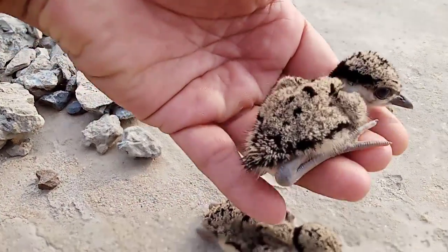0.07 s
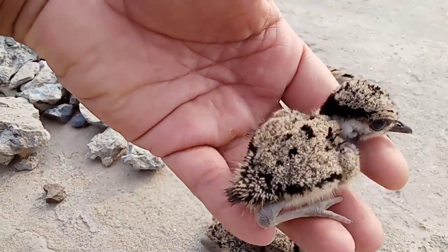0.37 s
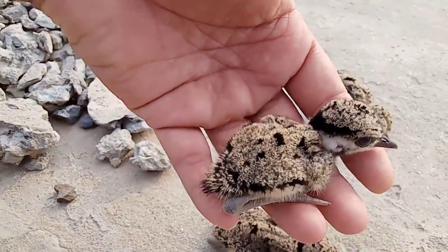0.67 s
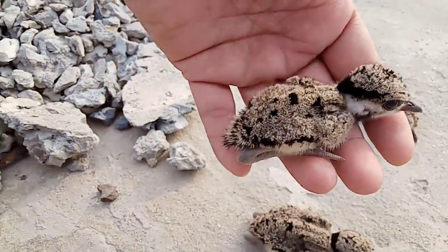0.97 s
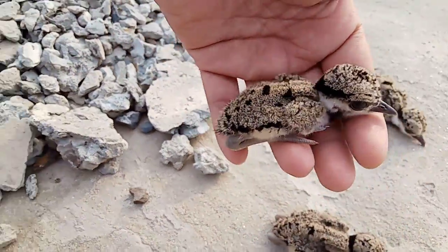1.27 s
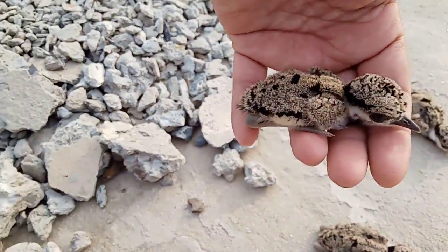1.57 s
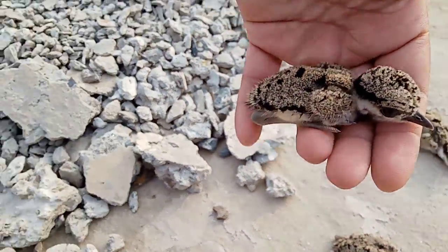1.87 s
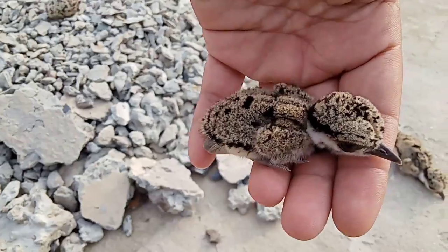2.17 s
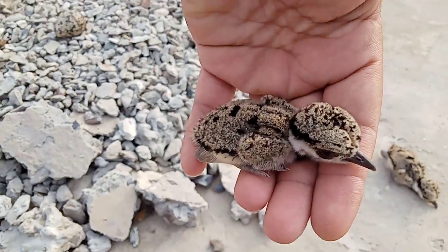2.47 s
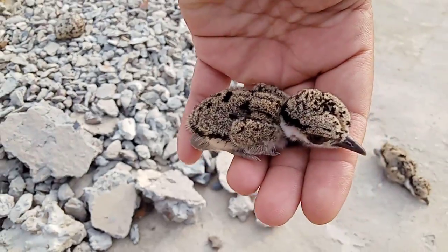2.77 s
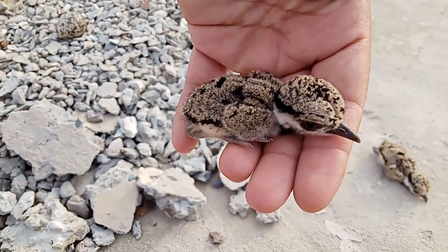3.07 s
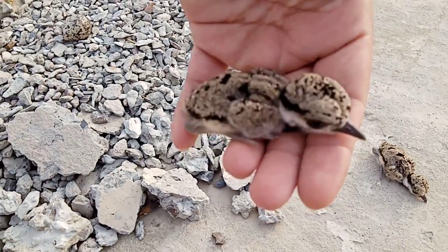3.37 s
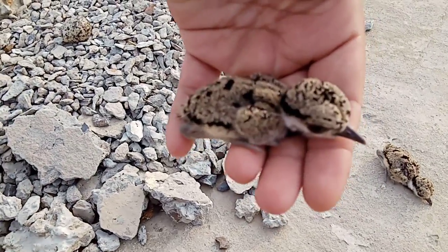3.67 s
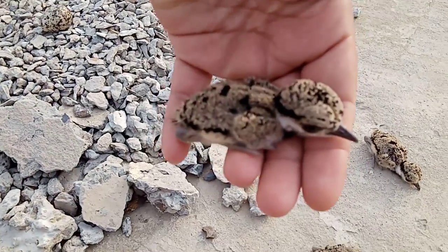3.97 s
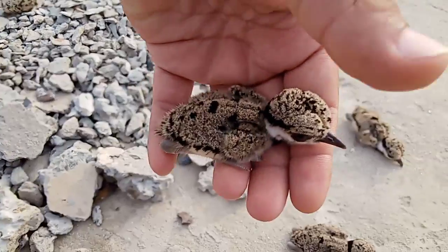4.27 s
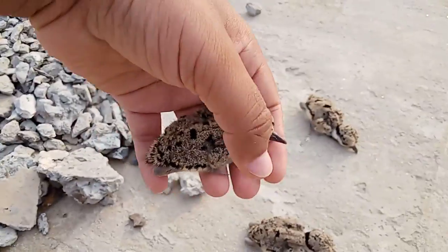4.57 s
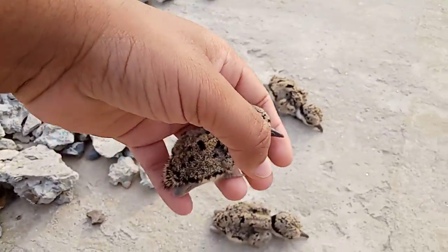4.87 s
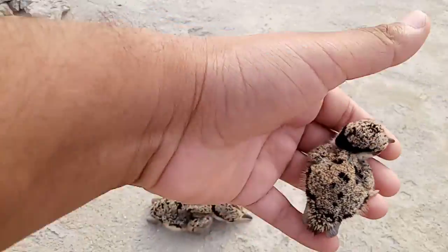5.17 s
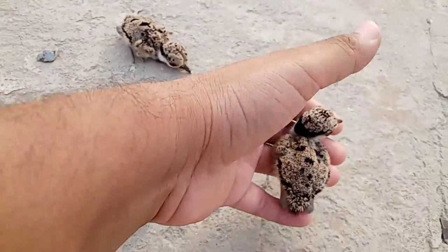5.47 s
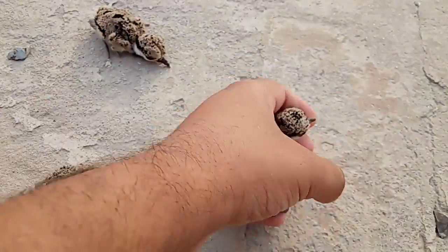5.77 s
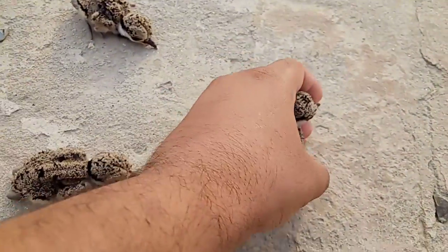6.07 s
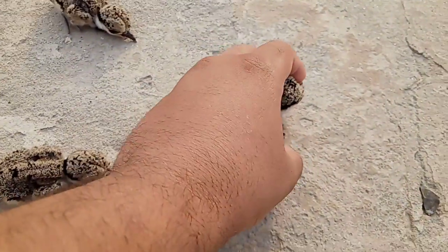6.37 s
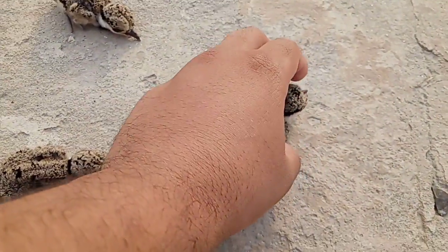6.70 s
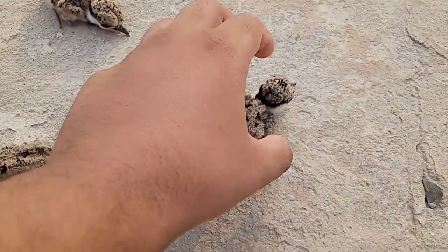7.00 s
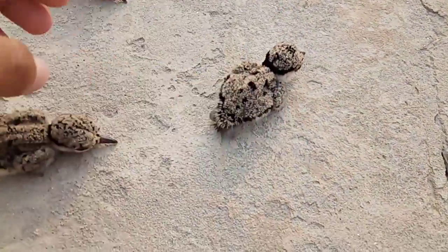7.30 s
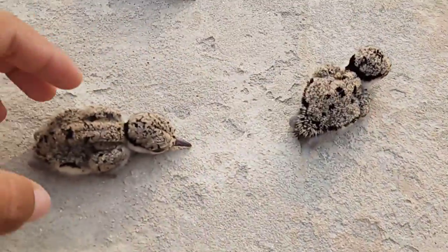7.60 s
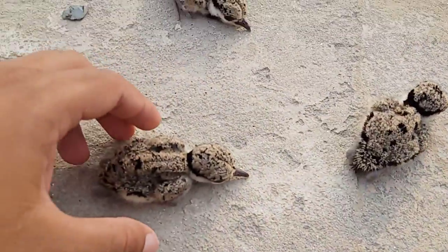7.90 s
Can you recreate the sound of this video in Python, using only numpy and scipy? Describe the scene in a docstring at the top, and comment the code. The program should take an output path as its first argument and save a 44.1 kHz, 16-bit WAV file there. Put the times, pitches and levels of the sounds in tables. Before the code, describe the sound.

Outdoors on bare ground, harsh, high bird calls repeat in quick succession, mixing clipped rattling notes with falling wails that end in a small yelp. They start close and gradually recede. Soft handling knocks and brushing hit the microphone in the first few seconds, over a faint, uneven wind rumble. Around the middle, a low hum and one brief horn are barely audible far away.

```python
"""On open, bare ground, lapwings scold while someone handles their chicks.
Each call is a few rattled 'kips' and a long note whose rattle runs into a falling wail that hooks up
at the end: a pulsed harmonic source, coloured by the throat and echoed by the surroundings. The birds
overlap and grow fainter as they move off. Light wind rumbles, a hand rustles and bumps the microphone,
and faint hums, steady tones and one horn carry from far away, made unsteady by the air."""
import sys
import numpy as np
from scipy import signal
from scipy.fft import rfft, irfft, next_fast_len
from scipy.io import wavfile
from scipy.ndimage import uniform_filter1d

SR = 44100
rng = np.random.default_rng(int(sys.argv[2]) if len(sys.argv) > 2 else 0)


def wav_record(signal):
    """Record a signal, one row per channel, as 16-bit PCM in the file named by sys.argv[1]."""
    frames = np.transpose(np.atleast_2d(signal))
    bounded = np.clip(frames, -1, 1)
    # unit amplitude maps onto the largest positive 16-bit level
    quanta = np.round(bounded * 32767).astype(np.int16)
    wavfile.write(sys.argv[1], SR, quanta)


N = 350154
TIME = np.arange(N) / SR
CUTOFF_HZ = 15900


def from_db(db):
    """Amplitude ratio of a level in decibels."""
    return 10 ** (np.asarray(db) / 20)


def rms_one(x):
    """Normalisation to rms 1."""
    return x / np.sqrt(np.mean(x ** 2) + 1e-20)


def at_hz(points, hz):
    """Interpolation of a spectrum on a log-frequency axis."""
    f, db = np.transpose(points)
    return np.interp(np.log(np.maximum(hz, 1)), np.log(f), db)


def noise(spectrum):
    """Spectral shaping of white noise, rms 1."""
    size = next_fast_len(N)
    gain = from_db(at_hz(spectrum, np.fft.rfftfreq(size, 1 / SR)))
    return rms_one(irfft(rfft(rng.standard_normal(size)) * gain, size)[:N])


def drift(hz):
    """Low-pass random process: a wander at up to about this rate, rms 1."""
    pole = np.exp(-2 * np.pi * hz / SR)
    return rms_one(signal.lfilter([1], [1, -2 * pole, pole * pole], rng.standard_normal(N + SR))[SR:])


def butter(x, hz, kind, order=2):
    """Causal Butterworth filter."""
    sections = signal.butter(order, np.clip(hz, 10, SR / 2 - 100), kind, fs=SR, output="sos")
    return signal.sosfilt(sections, x + 1e-18)


def ease(x):
    """Raised-cosine step from 0 to 1."""
    return np.sin(np.pi / 2 * np.clip(x, 0, 1)) ** 2


def during(start, end):
    """The samples between two times."""
    return slice(max(int(start * SR), 0), min(int(end * SR), N))


# spectra of wind rumble and handling rustle: (frequency [Hz], relative level [dB])
RUMBLE_SPECTRUM = [(20, -42), (30, -40.5), (45, -18), (62, -5.5), (85, -1.5), (115, 1), (170, 2),
                   (215, -4.5), (270, -13.5), (400, -19.5), (700, -52)]
RUSTLE_SPECTRUM = [(150, -9.5), (300, 0.5), (500, -2), (800, -7), (1500, -11.5), (3000, -14.5), (4000, -22),
                   (5500, -34.5), (10000, -35), (12000, -41.5), (16000, -46.5)]
# their envelopes: (time [s], relative rumble level [dB], relative rustle level [dB])
NOISE_ENVELOPES = [(0.0, -51, -58.5), (0.51, -53.5, -64), (0.77, -48, -59), (1.02, -47.5, -49.5),
                   (1.15, -47, -58), (1.77, -52.5, -60.5), (2.1, -49.5, -59), (2.52, -52.5, -56),
                   (2.72, -48.5, -60.5), (3.98, -52.5, -60), (4.55, -46, -56), (4.95, -53, -58.5),
                   (5.55, -56, -61.5), (5.95, -49.5, -60), (6.35, -56.5, -59.5), (6.68, -57, -64.5),
                   (7.67, -49.5, -57.5), (7.94, -53, -58)]


def wind_and_rustle(rumble_gain_db=1, rustle_gain_db=3, lumpy_db=1.5, grain_db=1.5):
    """Random amplitude modulation makes the wind's rumble lumpy and the hand's rustle grainy."""
    times, rumble_db, rustle_db = np.transpose(NOISE_ENVELOPES)
    rumble = from_db(np.interp(TIME, times, rumble_db) + rumble_gain_db + lumpy_db * drift(hz=23))
    rumble *= noise(RUMBLE_SPECTRUM)
    rustle = from_db(np.interp(TIME, times, rustle_db) + rustle_gain_db + grain_db * drift(hz=60.2))
    rustle *= noise(RUSTLE_SPECTRUM)
    return rumble + rustle


def rattle(cycle, duty, attack=0.075, release=0.34):
    """Pulse modulation: each pulse opens sharply and closes gently; a low duty leaves a gap."""
    return uniform_filter1d(ease(cycle / attack) * ease((duty - cycle) / release), size=24)


def upper_level(pitch_hz, third_db, usual_hz=1359, db_per_hz=0.0959):
    """Vocal effort: a bird that presses harder sings higher and brighter. Gain [dB] of harmonics 4 up."""
    return -11 + db_per_hz * (pitch_hz - usual_hz) + 0.85 * third_db


FUNDAMENTAL_DB = -22.5   # relative to the second harmonic, which the throat favours
# throat response for the fourth and higher harmonics: (frequency [Hz], gain [dB])
THROAT_RESPONSE = [(3700, -14.5), (4700, 8), (5400, -3.5), (6600, -6), (8100, -13), (8900, -20.5),
                   (9800, -15), (10500, -18.5), (11200, -23.5), (12200, -26.5), (13500, -31.5),
                   (15500, -35.5)]


def syrinx(pitch, first_db, third_db, upper_db, flutter, shimmer_db=2.0):
    """Source and filter: the throat colours a harmonic series whose upper partials flutter most."""
    phase = 2 * np.pi * np.cumsum(pitch) / SR
    out = from_db(first_db) * np.sin(phase) + np.sin(2 * phase)
    out += from_db(third_db + flutter / 2) * np.sin(3 * phase)
    for k in range(4, 14):
        swings = rng.standard_normal(size=6)
        shimmer = shimmer_db * np.interp(np.linspace(0, 5, len(pitch)), np.arange(6), swings)
        level_db = upper_db + at_hz(THROAT_RESPONSE, k * pitch) + flutter + shimmer
        out += from_db(level_db) * np.sin(k * phase) * (k * pitch < CUTOFF_HZ)
    return np.sqrt(2) * out


def squeak(pitch, cycle, spread_db=5, scatter=0.1):
    """Inharmonic partial: as each pulse opens, an unstable tone dives between harmonics 3 and 2."""
    pulse = np.cumsum(np.diff(cycle, prepend=0) < -.5)
    strength, offset = np.clip(rng.standard_normal((pulse[-1] + 1, 2)), -1.5, 1.5)[pulse].T
    ratio = 2.7 + scatter * offset - .45 * cycle
    envelope = from_db(spread_db * strength) * ease(cycle / .1) * np.exp(-(cycle / .42) ** 2)
    return envelope * np.sin(2 * np.pi * np.cumsum(pitch * ratio) / SR)


# short notes: (start [s], brief pulses [count], held pulse [s], pitch [Hz], relative level [dB],
# third harmonic re second [dB], roughness [ratio])
KIP_NOTES = [(0.022, 2, 0.024, 1370, -23, 6.5, 0.18), (0.354, 2, .033, 1432, -22.5, -1, 0.42),
             (0.979, 2, 0.0213, 1377, -20.5, -1.5, 0.33), (1.264, 2, 0.023, 1415, -22, -5.5, 0.42),
             (1.790, 2, 0.028, 1356, -28.5, -12.5, 0.17), (2.087, 0, .017, 1348, -34, 0, 0.2),
             (2.181, 2, 0.021, 1407, -27.5, -6.5, 0.42), (2.519, 3, 0.028, 1320, -35, -8.5, 0.2),
             (3.282, 3, .013, 1294, -35, -5.5, 0.37), (3.356, 0, 0.025, 1392, -38.5, -8.5, .3),
             (3.456, 3, 0.01, 1423, -34.5, -9.5, 0.42), (4.320, 0, 0.03, 1352, -35.5, -6.5, 0.03),
             (4.350, 2, 0.028, 1336, -35, -8, 0.3), (4.422, 3, 0.02, 1387, -36, -11, 0.42),
             (5.540, 5, 0.0216, 1420, -34, -15, 0.9), (5.666, 0, 0.026, 1362, -35.5, -9.5, 0.2),
             (5.777, 2, 0.022, 1390, -32, -14.5, 0.33), (6.069, 6, 0.019, 1396, -39, -11, 1),
             (6.835, 0, 0.034, 1358, -50.5, -5.5, 0.25), (6.952, 2, 0.033, 1370, -44, -10.5, 0.51),
             (7.283, 8, 0.023, 1382, -46.5, -7, 1.23), (7.693, 2, 0.022, 1332, -37.5, -6.5, 0.36)]


def kips(jitter, flutter, rasp, duty=0.68, sag=.025, scoop=.03, droop=0.062, rough_jitter=0.016,
         rasp_db=-17, squeak_db=-12, onset_db=-5):
    """Pulsed phonation: the last pulse is held as the pitch droops; in rough notes the pulses merge."""
    out = np.zeros(N)
    for start, count, held_s, top_hz, level_db, third_db, rough in KIP_NOTES:
        pulse_hz = 111 if rough > .5 else 65
        last = round(count)
        end = start + last / pulse_hz + held_s
        span = during(start, end)
        t = TIME[span]
        pulses = (t - start) * pulse_hz
        cycle = np.where(pulses < last, pulses % 1, np.minimum(pulses - last, .4))
        gate = rattle(cycle, duty + rough / 3) * ease((end - t) / 0.0036)
        onset = np.exp(-np.abs(t - start) / 0.011)
        arch = 1 - scoop * onset - droop * np.clip((t - end + .034) / 0.0333, 0, 1) ** 2
        pitch = top_hz * arch * (1 + sag * (.4 - cycle) + rough * rough_jitter * jitter[span])
        harsh_db = 9 * rough ** 2   # brings the fundamental, rasp and squeaks forward
        upper_db = upper_level(top_hz, third_db)
        voice = syrinx(pitch, FUNDAMENTAL_DB + harsh_db, third_db, upper_db, flutter[span])
        voice += 2 * rough * from_db(rasp_db + third_db / 2 + harsh_db / 2) * rasp[span]
        squeaks = squeak(pitch, cycle) * ease((last + .5 - pulses) / 0.23)
        voice += from_db(squeak_db + harsh_db + third_db / 2 + 2 * flutter[span]) * squeaks
        out[span] += from_db(level_db + 1.0 + onset_db * onset) * gate * voice
    return out


def wail_course(bottom_hz):
    """Pitch contour: the deepest wails curl up slowly; shallow ones crack early into a long, high yelp."""
    depths_hz = (896, 940.3, 1047)   # deepest, deep, shallow
    pulse_hz, yelp_hz = (65.5, 65.5, 72), (1090, 1497, 1633)
    fall_s, rise_s, yelp_s = (.077, .077, .065), (0.066, .034, .004), (0.0033, .014, .033)
    return [np.interp(bottom_hz, depths_hz, row) for row in (pulse_hz, fall_s, rise_s, yelp_s, yelp_hz)]


# long notes: (start [s], rattle length [s], top pitch [Hz], bottom pitch [Hz], rattle level [dB],
# glide level [dB], third harmonic re second [dB], glide roughness [ratio])
WAIL_NOTES = [(0.14, 0.13, 1383, 1112, -24, -24, 3, 0.4), (0.481, 0.12, 1388, 942, -21, -27, -5, 0.04),
              (1.099, .128, 1321, 1008, -20.5, -21.5, -8.5, 0.02),
              (1.39, .130, 1362, 936.4, -23, -29, -11.5, .1),
              (1.921, .110, 1314, 1013, -33, -31.5, -13, 0.2), (2.306, .130, 1345, 932, -27.5, -36, -10, 0),
              (2.653, 0.099, 1283, 1054, -37.5, -30.5, -11, .1),
              (3.418, 0.11, 1280, 1058, -37, -32, -9.5, 0.12),
              (3.583, .130, 1350, 937, -36.5, -36, -9, 0.2), (4.493, .148, 1333, 900, -34.5, -32, -16, 0.2),
              (4.555, .065, 1329, 1038, -31, -45, -18, 0.2),
              (5.902, 0.14, 1348, 951, -32.5, -44.5, -16, 0.38),
              (6.226, 0.13, 1332, 1042, -43, -39, -9.5, 0.54), (7.074, .110, 1332, 913, -48, -46, -8, 0.46),
              (7.816, 0.12, 1324, 984, -42.5, -45, -5.5, .3)]


def wails(jitter, flutter, rasp, first_duty=0.7, last_duty=1.16, sag=.03, rattle_jitter=0.016,
          rough_jitter=0.062, rasp_db=-19, screech_db=-7, squeak_db=-7, soften_db=-7, rise_hz=165,
          yelp_db=2, yelp_first_db=-7, yelp_third_db=-9, yelp_rough=0.45):
    """A growing duty cycle merges the pulses into a falling whistle; a register break ends it in a yelp."""
    out = np.zeros(N)
    for start, rattle_s, top_hz, bottom_hz, rattle_db, glide_db, third_db, rough in WAIL_NOTES:
        pulse_hz, fall_s, rise_s, yelp_s, yelp_hz = wail_course(bottom_hz)
        merge, bottom, crack, end = start + np.cumsum([rattle_s, fall_s, rise_s, yelp_s])
        span = during(start, end)
        t = TIME[span]
        along = np.clip((t - start) / rattle_s, 0, 1)
        merged, cracked = ease((t - merge + 0.0095) / 0.013), ease((t - crack) / 0.0081)
        cycle = (t - start) * pulse_hz % 1
        duty = first_duty + (last_duty - first_duty) * np.sqrt(along)
        gate = rattle(cycle, duty, attack=0.22, release=0.39)
        gate = (gate + merged * (1 - gate)) * ease((end - t) / 0.0048)

        merge_hz = .912 * top_hz
        arch = top_hz * (1 - 0.066 * np.exp(-np.abs(t - start) / 0.01874))
        arch += (merge_hz - top_hz) * np.maximum(2 * along - 1, 0) ** 2
        fall = (bottom_hz - merge_hz) * np.sin(np.pi / 2 * np.clip((t - merge) / fall_s, 0, 1))
        pitch = arch + fall + rise_hz * ease((t - bottom) / 0.061)
        yelp_pitch = yelp_hz * (1 - .17 * ease((end - t) / 0.047))
        pitch += cracked * (yelp_pitch - pitch)
        harsh = merged * (rough + cracked * (yelp_rough - rough))
        wobble = sag * (.4 - cycle) + rattle_jitter * jitter[span]
        pitch *= 1 + (1 - merged) * wobble + rough_jitter * harsh * jitter[span]

        soft_db = soften_db * merged * (1 - cracked)   # the glide is purer than rattle and yelp
        first_db = FUNDAMENTAL_DB + cracked * (yelp_first_db - FUNDAMENTAL_DB)
        bright_db = third_db + soft_db + cracked * (yelp_third_db - third_db)
        voice = syrinx(pitch, first_db, bright_db, upper_level(top_hz, third_db) + soft_db, flutter[span])
        voice += (from_db(rasp_db + third_db / 2 + soft_db) + harsh * from_db(screech_db)) * rasp[span]
        squeaks = (1 - merged) * squeak(pitch, cycle)
        voice += from_db(squeak_db + third_db / 2 + 2 * flutter[span]) * squeaks

        bottom_db = (rattle_db + glide_db) / 2 - 9
        times = [start, start + rattle_s / 2, merge - rattle_s / 10, merge + fall_s / 10, bottom, end]
        levels_db = [rattle_db - 1.0, rattle_db + 3.5, rattle_db, glide_db, bottom_db, bottom_db + yelp_db]
        out[span] += from_db(np.interp(t, times, levels_db)) * gate * voice
    return out


# echoes from the surroundings: (delay [s], gain [dB])
REFLECTIONS = [(0.012, -11), (0.035, -21), (0.065, -26.5)]


def open_ground(x, tail_db=-20.0, tail_t60=0.63, dull_hz=5000):
    """Reflection and scattering: stones and walls add a few distinct echoes and a thin, dull tail."""
    t = TIME[:SR]
    scatter = butter(rng.standard_normal(SR), dull_hz, "low")
    scatter *= from_db(-60 * t / tail_t60) * ease(t / 0.011)
    response = from_db(tail_db) * scatter / np.sqrt(np.sum(scatter ** 2))
    for delay, level_db in REFLECTIONS:
        response[int(delay * SR)] += from_db(level_db)
    return x + signal.fftconvolve(x, response)[:N]


# noise in the voice: (frequency [Hz], relative level [dB])
RASP_SPECTRUM = [(900, -30.5), (1500, 5.5), (2000, -9), (2700, 11.5), (3500, 5.5), (4700, -19),
                 (7000, -23.5), (9000, -31.5), (15000, -41.5)]


def lapwings(flutter_db=3.5, waver_db=1.9):
    """Common modulation: all notes share one unsteadiness of pitch, timbre, rasp and strength."""
    jitter, flutter, rasp = drift(hz=700), flutter_db * np.tanh(drift(hz=59.3)), noise(RASP_SPECTRUM)
    calls = kips(jitter, flutter, rasp) + wails(jitter, flutter, rasp)
    return open_ground(calls * from_db(waver_db * np.tanh(drift(hz=45))))


def noise_burst(start, length, centre_hz, octaves, level_db):
    """Band-limited noise that swells and fades under a tapered window."""
    out, span = np.zeros(N), during(start, start + length)
    edges_hz = centre_hz * 2 ** (np.array([-.5, .5]) * octaves)
    band = butter(rng.standard_normal(span.stop - span.start), edges_hz, "band")
    out[span] = from_db(level_db) * rms_one(band * signal.windows.tukey(len(band), .8))
    return out


# puffs of air: (start [s], length [s], level [dB])
AIR_PUFFS = [(0.241, .08, -44), (0.749, 0.085, -44.5), (1.026, 0.23, -40), (2.091, 0.089, -47.5)]


def puffs(centre_hz=84, octaves=1.2):
    """Pressure fluctuation: air striking the microphone makes bursts of bass noise."""
    return sum(noise_burst(start, length, centre_hz, octaves, db) for start, length, db in AIR_PUFFS)


# brushes and hisses: (start [s], length [s], centre [Hz], bandwidth [octaves], level [dB])
BRUSH_STROKES = [(0.68, .58, 8000, 0.33, -67), (0.77, 0.34, 1990, 1.9, -51.5), (3.355, 0.1, 900, 2.3, -50),
                 (4.42, 0.15, 900, 2.8, -52.5), (4.83, 0.56, 9430, .3, -82.5),
                 (4.946, .22, 2760, 0.57, -63.5), (5.285, 0.089, 536, 0.89, -52.5),
                 (6.665, 0.047, 1770, 1.7, -64.5), (7.686, 0.15, 9000, .35, -74),
                 (7.765, 0.032, 1490, 0.39, -54.5)]


def brushes():
    """Friction noise of the brushing hand, and soft hisses, each in its own band."""
    return sum(noise_burst(*stroke) for stroke in BRUSH_STROKES)


# knocks on the microphone: (time [s], relative level [dB], low-pass cutoff [Hz])
KNOCKS = [(0.896, -21.5, 1450), (1.031, -25, 352), (1.103, -17, 915), (1.121, -23, 506), (1.166, -25, 450),
          (1.432, -15, 620), (2.280, -18, 424), (5.298, -35.5, 1492), (7.538, -34.5, 1790)]


def knocks(ring_hz=112, ring_t60=0.036, ring_db=-2, contact_hz=250):
    """Impact and damped resonance: a soft knock gives a rounded click, and the casing rings in the bass."""
    out = np.zeros(N)
    for start, level_db, bright_hz in KNOCKS:
        span = during(start, start + .15)
        t = TIME[span] - TIME[span.start]
        contact = butter(signal.unit_impulse(len(t)), bright_hz, "low", order=3)
        click = butter(contact, contact_hz, "high")
        ring = np.sin(2 * np.pi * ring_hz * t) * from_db(ring_db - 60 * t / ring_t60) * ease(t / 0.0019)
        out[span] += from_db(level_db) * (ring - 0.61 * click / np.abs(click).max())
    return out


# low hums and a steady tone: (start [s], end [s], frequency [Hz], level [dB])
HUMS = [(4.958, 5.16, 890, -62.5), (2.58, 6.2, 116, -64.5), (2.5, 5, 168, -57), (3.9, 4.9, 215.2, -53.5)]
# partials of the horn: (frequency [Hz], level [dB])
HORN_PARTIALS = [(816, -69), (985, -77.5), (1216, -74.5), (1626, -71), (2430, -72.5)]


def far_hums_and_horn(horn_start_s=2.85, horn_end_s=3.4, waver_db=6.0, waver_hz=5):
    """Atmospheric fluctuation: the air makes distant tones waver together in level and pitch."""
    out = np.zeros(N)
    fading, wander = waver_db * drift(hz=11), waver_hz * drift(hz=26)
    horn = [(horn_start_s, horn_end_s, hz, level_db) for hz, level_db in HORN_PARTIALS]
    for start, end, hz, level_db in list(HUMS) + horn:
        span = during(start, end)
        tone = np.sqrt(2) * np.sin(2 * np.pi * np.cumsum(hz + wander[span]) / SR)
        out[span] += from_db(level_db + fading[span]) * tone * signal.windows.tukey(len(tone), .3)
    return out


def scene():
    """Superposition of birds, wind, handling and distant tones in one channel."""
    return (lapwings() + wind_and_rustle() + puffs() + brushes() + knocks() + far_hums_and_horn())[None]


def record(dry):
    """Band limiting: the microphone loses the deepest bass, and the top is cut steeply."""
    thinned = butter(dry, 47, "high", order=3)
    return signal.sosfilt(signal.ellip(10, .1, 70, CUTOFF_HZ, fs=SR, output="sos"), thinned)


dry = scene()
out = record(dry)
wav_record(out)
```